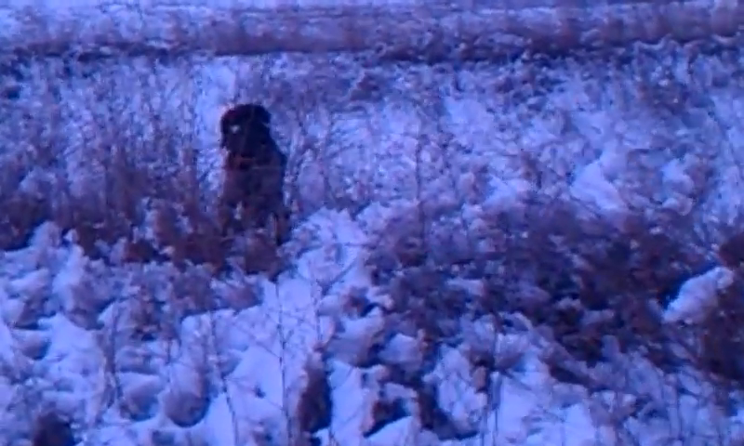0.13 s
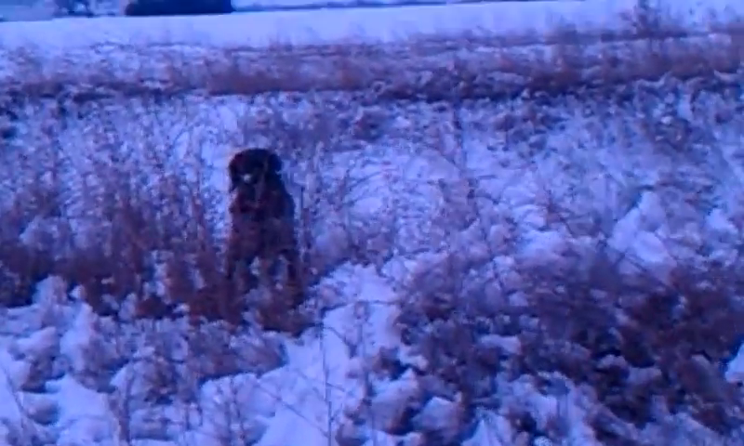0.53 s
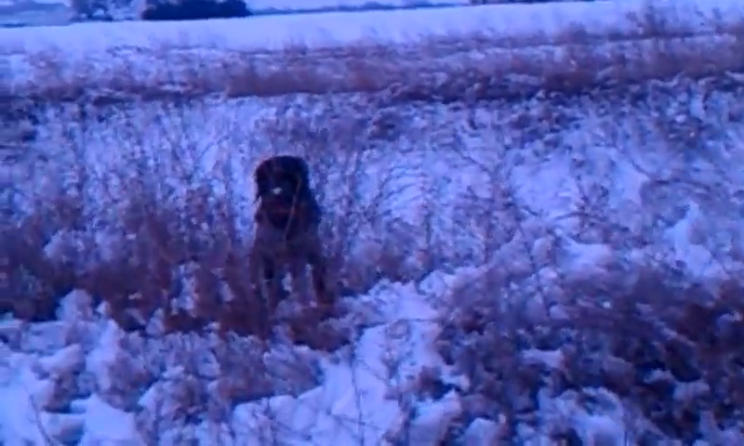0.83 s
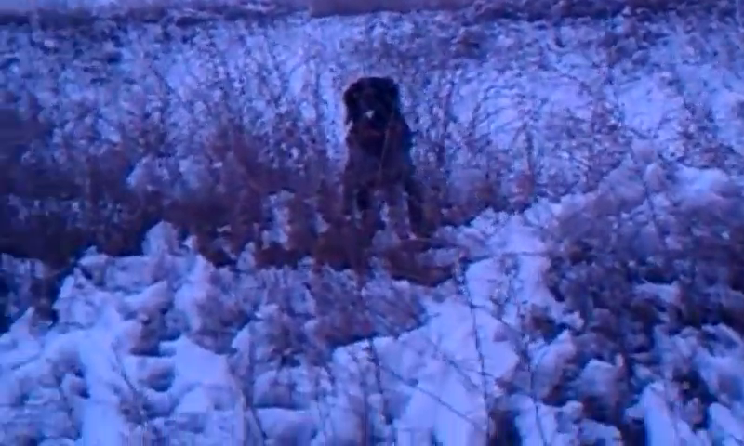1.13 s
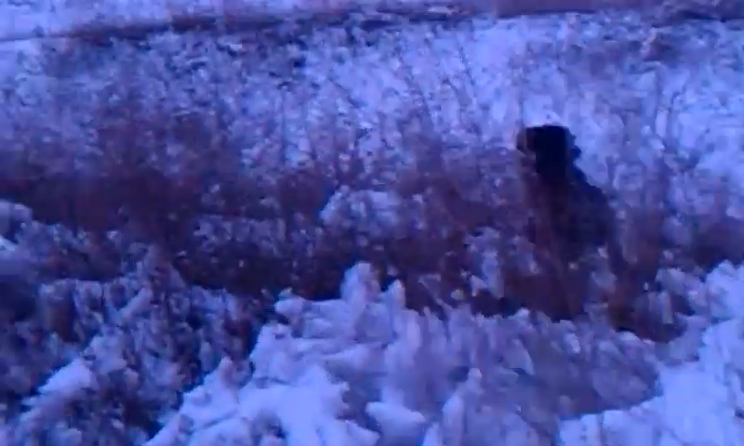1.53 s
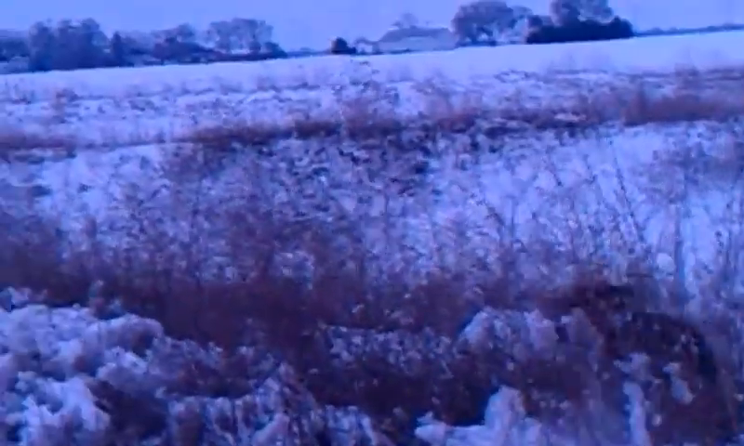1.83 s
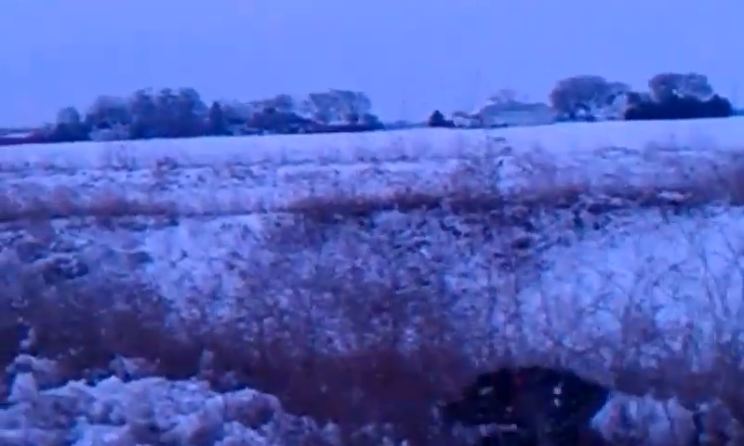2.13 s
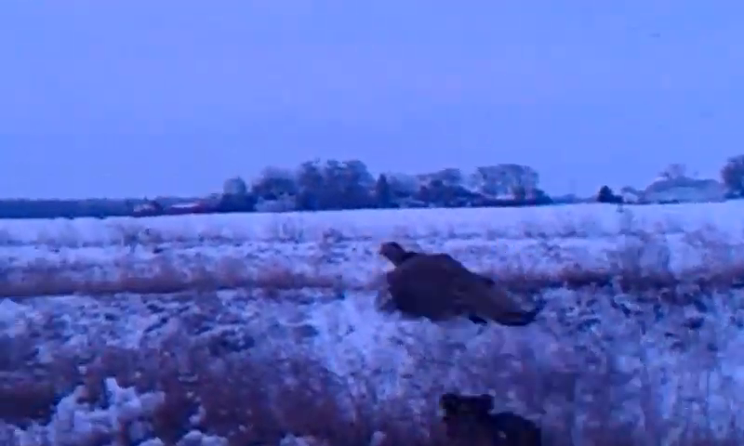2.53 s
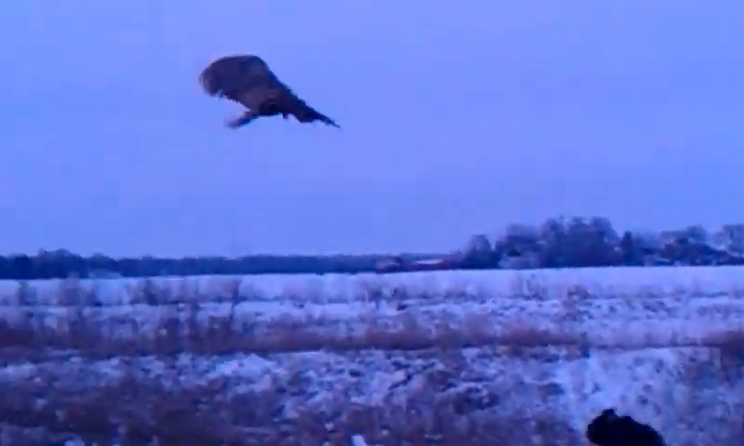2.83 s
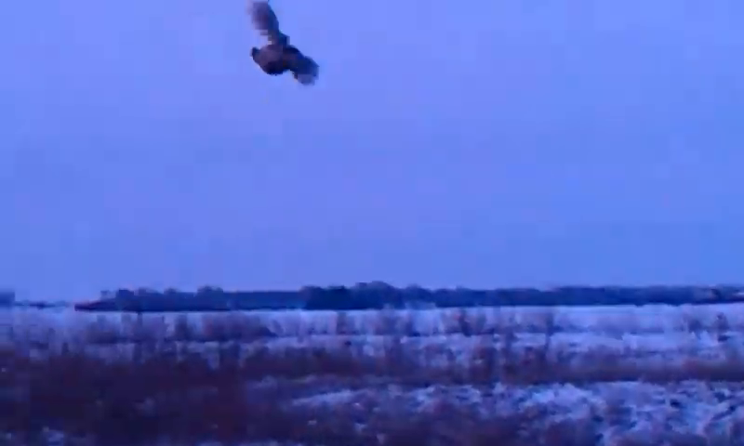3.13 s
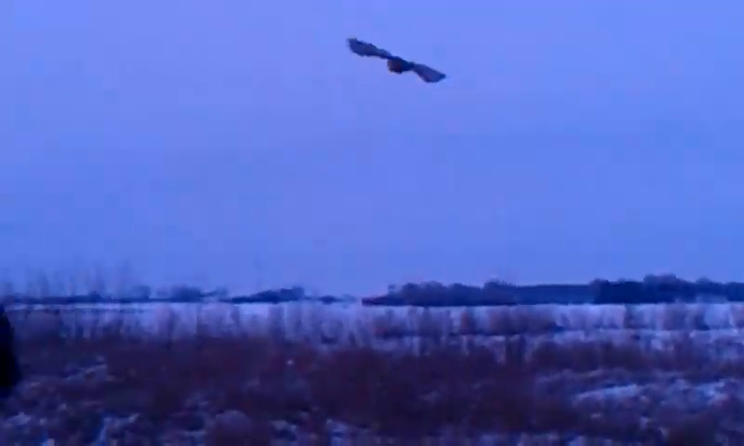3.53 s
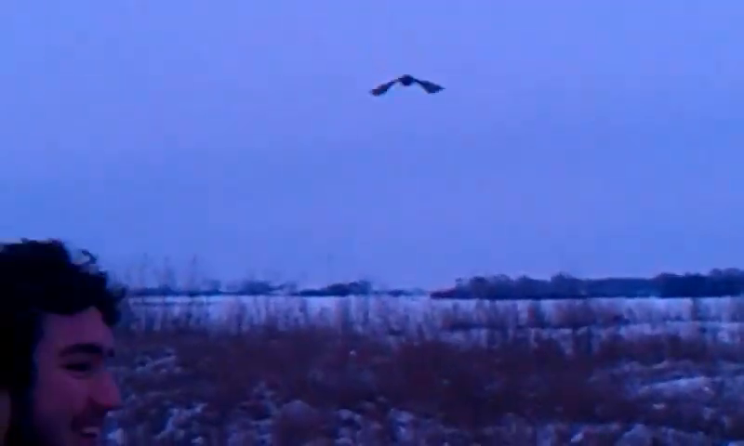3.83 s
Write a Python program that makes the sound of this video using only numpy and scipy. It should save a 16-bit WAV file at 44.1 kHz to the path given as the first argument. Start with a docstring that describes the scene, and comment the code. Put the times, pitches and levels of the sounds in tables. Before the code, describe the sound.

A pheasant's wings thrash out of dry brush and beat away, whirring, in gusty wind.

```python
"""Pheasant flushing in snow

Dry grass rustles and snow crunches underfoot. A pheasant breaks out of frozen brush, its wings
thrashing and snapping the stalks, then flies past at 14 beats a second, the stiff feathers
chirping and humming at each stroke. Wind buffets the microphone; one sharp click comes late."""
import sys
import numpy as np
from scipy import signal
from scipy.fft import rfft, irfft
from scipy.io import wavfile
from scipy.ndimage import uniform_filter1d

SR = 44100
rng = np.random.default_rng(int(sys.argv[2]) if len(sys.argv) > 2 else 0)


def to_wav(sig):
    """Store sig (one row per channel, or 1-D mono) as 16-bit WAV at the path in sys.argv[1].

    Samples outside -1..1 are clipped; the rate is SR.
    """
    pcm = np.clip(np.atleast_2d(sig), -1, 1) * 32767
    pcm = np.round(pcm).astype(np.int16)
    wavfile.write(sys.argv[1], SR, pcm.T)  # frames by channels


N = 176400
TIME = np.arange(N) / SR


def amp(db):
    """Decibels to gain."""
    return 10 ** (np.asarray(db) / 20)


def unit(x):
    """Scale to rms 1."""
    return x / np.sqrt(np.mean(x ** 2) + 1e-20)


def add(mix, s, sound):
    """Mix a sound in at s seconds."""
    part = mix[max(round(s * SR), 0):][:len(sound)]
    part += sound[:len(part)]


def curve(points, s=TIME):
    """Interpolate (t/s, value) points."""
    return np.interp(s, *np.transpose(points))


def colour(x, spectrum):
    """Filter by (f/Hz, level/dB) points, to rms 1."""
    hz, db = np.transpose(spectrum)
    f = np.fft.rfftfreq(len(x), 1 / SR)
    gain = amp(np.interp(np.log(f + 1), np.log(hz), db))
    return unit(irfft(rfft(x) * gain, len(x)))


def wander(rate_hz):
    """Slow random motion, rms 1."""
    f = np.fft.rfftfreq(N, 1 / SR)
    return unit(irfft(rfft(rng.standard_normal(N)) / (1 + (f / rate_hz) ** 4), N))


def crackle(spectrum, per_s, spread_db, hiss, clump_db, stalks=24, decay_s=0.00038):
    """Clumps of tiny uneven cracks, each ringing one stalk, over a hiss of rubbing."""
    sizes = amp(spread_db * np.minimum(rng.exponential(1, N), 3))
    hits = sizes * (rng.random(N) < per_s / SR)
    stalk = rng.integers(stalks, size=N)
    rings = rng.standard_normal((stalks, 256)) * np.exp(-np.arange(256) / SR / decay_s)
    cracks = sum(signal.oaconvolve(hits * (stalk == k), unit(ring))[:N] for k, ring in enumerate(rings))
    rustle = unit(cracks) + hiss * rng.standard_normal(N)
    return colour(rustle * amp(clump_db * wander(rate_hz=58)), spectrum)


# Grass rustle: t/s, level/dB
GRASS_LEVEL = [(0, -36.5), (.06, -35), (.19, -45.5), (.3, -41.5), (.45, -44), (.6, -33.5), (.69, -32),
               (.8, -37), (.95, -48.5), (1.08, -46.5), (1.2, -36.5), (1.6, -81)]
# Grass spectrum: f/Hz, level/dB
GRASS_EQ = [(300, -9), (3400, -7), (5500, -13), (7000, -9), (8150, 3), (9200, -8), (16000, -20.5)]


def grass():
    """Dry blades stir and rub before the flush."""
    return crackle(GRASS_EQ, per_s=2300, spread_db=2.0, hiss=1.3, clump_db=1.85) * amp(curve(GRASS_LEVEL))


def eddies(spectrum):
    """Turbulent noise of even strength."""
    noise = colour(rng.standard_normal(N), spectrum)
    power = uniform_filter1d(uniform_filter1d(noise ** 2, size=700), size=500)
    return unit(noise / np.sqrt(power))


def swells(rows, edge):
    """Gain of rounded bursts (t/s, length/s, level/dB); a higher edge is squarer."""
    return np.sqrt(sum(amp(db) ** 2 * np.exp(-abs(2 * (TIME - s) / length) ** edge)
                       for s, length, db in rows))


# Field air spectrum: f/Hz, level/dB
AIR_EQ = [(30, 25.5), (700, 9), (1600, 6.5), (3500, -17), (5500, -9), (8000, -23), (16000, -63)]
# Rumble between buffets: t/s, level/dB
RUMBLE_LEVEL = [(.2, -71), (.6, -41.5), (.93, -50), (1.72, -47), (1.87, -36.5), (2.11, -54), (2.22, -29),
                (2.92, -29.5), (3.05, -32.5), (3.19, -43.5), (3.3, -25.5), (3.85, -30), (3.92, -55)]
# Rumble spectrum: f/Hz, level/dB
RUMBLE_EQ = [(20, -25), (60, 1.5), (120, 5), (400, -8.5), (700, -19.5), (1100, -47), (8000, -115)]
# Buffets: peak t/s, length/s, level/dB
WIND_BUFFETS = [(.37, 0.042, -38.5), (.69, 0.049, -34), (1.025, 0.03, -38.5), (1.785, 0.032, -32.5),
                (2.278, 0.023, -23.5), (2.387, 0.031, -16.5), (2.455, 0.056, -22), (2.522, 0.022, -17),
                (2.595, 0.059, -21), (2.758, 0.044, -25.5), (2.815, 0.052, -24), (2.87, 0.014, -19.5),
                (2.94, 0.064, -24.5), (3.293, 0.024, -17.5), (3.33, 0.021, -20), (3.39, 0.048, -17),
                (3.44, 0.012, -15), (3.482, 0.021, -16), (3.55, 0.029, -17.5), (3.605, 0.041, -19),
                (3.677, 0.026, -18.5), (3.72, 0.03, -19), (3.805, 0.02, -23.5)]
# Buffet spectrum: f/Hz, level/dB
BUFFET_EQ = [(25, -6.5), (110, 6), (250, -0.5), (450, -8), (750, -19), (1100, -45), (8000, -116)]
# Puffs, the first as the wings pass close: t/s, level/dB
AIR_PUFFS = [(2.749, -22), (2.764, -22), (2.869, -22), (2.896, -21), (3.335, -23.5), (3.407, -24.5),
             (3.476, -28), (3.674, -26.5)]
# Puff length; spectrum: f/Hz, level/dB
PUFF_S, PUFF_EQ = 0.0088, [(100, 7), (750, -1), (1400, -17.5), (8000, -92)]


def wind(air_db=-46):
    """Rumble, buffets and sharp puffs on the microphone, over quiet field air."""
    air = amp(air_db) * colour(rng.standard_normal(N), AIR_EQ)
    rumble = eddies(RUMBLE_EQ) * amp(curve(RUMBLE_LEVEL))
    buffets = eddies(BUFFET_EQ) * swells(WIND_BUFFETS, edge=10.5)
    puffs = eddies(PUFF_EQ) * swells([(s, PUFF_S, db) for s, db in AIR_PUFFS], edge=2.2)
    return air + rumble + buffets + puffs


# Snow underfoot: t/s, level/dB
SNOW_CRUNCHES = [(.031, -27.5), (.319, -27.5), (.488, -27.5), (0.539, -32.5), (0.696, -33), (1.044, -24.5)]
# Grit spectrum: f/Hz, level/dB
GRIT_EQ = [(700, -2), (12000, -21)]


def crunches(knock_hz=378, knock_decay_s=0.0019, grit_decay_s=0.0057, grit_db=-6):
    """Snow crust gives way: a dull knock, a short gritty tail."""
    out, t = np.zeros(N), np.arange(2048) / SR
    for s, db in SNOW_CRUNCHES:
        knock = np.sin(2 * np.pi * knock_hz * rng.uniform(.8, 1.2) * t) * np.exp(-t / knock_decay_s)
        grit = colour(rng.standard_normal(len(t)), GRIT_EQ) * np.exp(-t / grit_decay_s)
        add(out, s, amp(db) * (knock + amp(grit_db) * grit))
    return out


# Breaking stalks: t/s, level/dB, f/Hz
STALK_SNAPS = [(.872, -25.5, 11000), (1.284, -25, 7040), (1.392, -21, 7700), (1.422, -18, 8000),
               (1.946, -29, 6950), (1.825, -11, 8250), (1.919, -13.5, 11900), (1.966, -14, 7900),
               (2.029, -20, 7500), (2.38, -19, 7000), (2.491, -15.5, 8600)]


def snaps(decay_s=0.00074, width_oct=0.28, body_db=-17):
    """Each breaking stalk cracks around its own pitch."""
    out, t, f = np.zeros(N), np.arange(1024) / SR, np.fft.rfftfreq(1024, 1 / SR)
    envelope = t / decay_s * np.exp(1 - t / decay_s)
    for s, db, hz in STALK_SNAPS:
        shape = np.exp(-(np.log2((f + 1) / hz) / width_oct) ** 2) + amp(body_db) * f / (f + 1500)
        crack = irfft(rfft(rng.standard_normal(len(t)) * envelope) * shape)
        add(out, s - decay_s, amp(db) * unit(crack) * np.sqrt(np.mean(envelope ** 2)))
    return out


def patchy(x, depth_db):
    """Narrow spectral peaks and dips come and go at random, giving the rustle a faint warble."""
    frames = signal.stft(x, nperseg=512)[2]
    patches = uniform_filter1d(rng.standard_normal(frames.shape), size=2, axis=0)
    patches = unit(uniform_filter1d(patches, size=7, axis=1))
    return unit(signal.istft(frames * amp(depth_db * patches), nperseg=512)[1][:N])


# Shaken brush: t/s, level/dB
BRUSH_LEVEL = [(1.05, -42), (1.17, -38.5), (1.24, -24.5), (1.7, -27.5), (1.92, -28), (2.1, -31), (2.2, -35),
               (2.365, -37.5), (2.385, -28), (2.7, -31.5), (2.9, -37.5), (3.2, -39), (3.45, -53),
               (4, -49.5)]
# Brush spectrum: f/Hz, level/dB
BRUSH_EQ = [(100, -8), (400, -11.5), (800, -4.5), (1600, -2.5), (2400, -7.5), (3600, 0), (4700, -3),
            (5600, -6.5), (6600, 4), (8300, 4), (10200, 0.5), (12000, -10), (16000, -12)]
# Wing blows on the brush: start t/s, length/s, level/dB
WING_BLOWS = [(1.225, 0.047, -38), (1.295, 0.029, -24), (1.386, 0.037, -17), (1.47, 0.029, -17.5),
              (1.547, 0.035, -20), (1.641, 0.031, -23.5), (1.734, 0.0053, -22), (1.822, 0.019, -21.5),
              (1.902, .022, -24.5), (1.988, 0.017, -23.5), (2.38, 0.032, -30), (2.467, 0.026, -23),
              (2.54, 0.027, -22.5), (2.646, 0.0067, -29.5)]


def brush(attack_s=0.0059, release_s=0.015):
    """Frozen brush shakes; each wing blow adds an abrupt burst of crackle that dies away."""
    shaking = crackle(BRUSH_EQ, per_s=700, spread_db=2.5, hiss=1.0, clump_db=1.5)
    blows = crackle(BRUSH_EQ, per_s=1200, spread_db=3.8, hiss=0.45, clump_db=1.2)
    force = np.zeros(N)
    for s, length, db in WING_BLOWS:
        attack = np.clip((TIME - s) / attack_s + 1, 0, 1)
        release = np.exp(-np.maximum(TIME - s - length, 0) / release_s)
        force += amp(db) * attack * release
    return patchy(shaking, depth_db=4.5) * amp(curve(BRUSH_LEVEL)) + patchy(blows, depth_db=4.0) * force


CHIRP_HZ, CHIRP_S = 3462, 0.011  # nominal
HUM_HZ, HUM_S = 575, 0.01426  # nominal
LEAD_S = 0.0049  # stroke onset to peak
# Feather swish spectrum: f/Hz, level/dB
SWISH_EQ = [(300, -15), (1500, -4), (5200, -15), (8400, -1.5), (14000, -40)]


def stroke(chirp_db, hum_db, hum_hz, stretch, swish_db, rough, chirp_hz=CHIRP_HZ):
    """A feather flutters with a falling hum, chopping a falling whistle and a swish of air."""
    t = np.arange(1024) / SR

    def arch(length):
        """Swell with an early peak."""
        return np.sin(np.pi * np.minimum(t / length, 1) ** 0.72) ** 2

    def glide(hz, jitter, fall, length):
        """Phase of a randomly detuned, falling note."""
        pitch = hz * (1 + jitter * rng.standard_normal()) * np.exp(-fall * (t / length - .4))
        return 2 * np.pi * (np.cumsum(pitch) / SR + rng.random())

    chirp_s = CHIRP_S * stretch
    flutter = glide(hum_hz, jitter=0.027, fall=0.56, length=HUM_S)
    whistle = glide(chirp_hz, jitter=0.02, fall=0.23 * rng.uniform(.6, 1.5), length=chirp_s)
    whistle += rough * unit(uniform_filter1d(rng.standard_normal(len(t)), size=40))
    overtone = amp(-8.5) * np.sin(2.4 * whistle)
    undertone = amp(-11.5) * np.sin(whistle - flutter)
    tone = np.sqrt(2) * (np.sin(whistle) + overtone + undertone)
    swish = amp(swish_db) * colour(rng.standard_normal(len(t)), SWISH_EQ)
    chirp = (tone + swish) * (1 + 0.2 * np.sin(flutter))
    hum = np.sqrt(2) * np.sin(flutter)
    return amp(chirp_db) * arch(chirp_s) * chirp + amp(hum_db) * arch(HUM_S) * hum


# Flaps in the brush: t/s, hum level/dB, flutter f/Hz
FIRST_FLAPS = [(1.305, -30.5, 786), (1.488, -31.5, 812), (1.62, -31.5, 1486), (1.741, -32.5, 1124),
               (2.044, -30, 712)]


def flaps():
    """Rough first wingbeats: mostly swish, little whistle."""
    out = np.zeros(N)
    for s, db, hz in FIRST_FLAPS:
        add(out, s - LEAD_S, stroke(db - 12, db, hz, stretch=0.83, swish_db=15, rough=1.2))
    return out


# Downstrokes: t/s, chirp level/dB
DOWN_BEATS = [(1.853, -23), (1.924, -24.5), (1.993, -23), (2.064, -20), (2.136, -22), (2.207, -24.5),
              (2.278, -22.5), (2.351, -25), (2.422, -27.5), (2.493, -33), (2.566, -42), (2.638, -28),
              (2.711, -32.5), (2.784, -30.5), (2.857, -30.5), (2.931, -33.5), (3.002, -36), (3.077, -40.5),
              (3.152, -44), (3.224, -37.5), (3.299, -42.5), (3.373, -37.5), (3.445, -44), (3.616, -47.5),
              (3.691, -45), (3.912, -44.5)]
# Feather hum, strongest at lift-off: t/s, level/dB
DOWN_HUM_LEVEL = [(1.88, -32), (2.064, -22.5), (2.14, -33.5), (3.199, -42)]
# Second chirp relative to first: t/s, level/dB
SECOND_LEVEL = [(2, -18), (2.4, -6), (2.95, -8.5), (3.1, 4), (3.5, -13)]


def downstrokes(takeoff_s=2, hum_rise=0.16, settle_s=0.2, gap_s=0.0172):
    """Feathers chirp twice per downstroke; the hum is higher while the bird climbs hardest."""
    out = np.zeros(N)
    for s, db in DOWN_BEATS:
        hz = HUM_HZ * (1 + hum_rise * np.exp(-max(s - takeoff_s, 0) / settle_s))
        first = stroke(db, curve(DOWN_HUM_LEVEL, s), hz, stretch=0.96, swish_db=-6, rough=0.076)
        second_db = db + curve(SECOND_LEVEL, s)
        second = stroke(second_db, second_db - 1.5, hz, stretch=0.85, swish_db=-18, rough=0.17)
        add(out, s - LEAD_S, first)
        add(out, s - LEAD_S + gap_s, second)
    return out


# Upstrokes: t/s, chirp level/dB, hum level/dB
UP_BEATS = [(2.598, -32, -38), (2.750, -29, -23), (2.82, -31, -29.5), (2.893, -31, -27.5),
            (2.966, -36.5, -32.5), (3.04, -33, -25.5), (3.115, -30.5, -27), (3.192, -30.5, -30),
            (3.267, -38.5, -37), (3.342, -43, -31)]
# Upstroke chirp pitch: t/s, f/Hz
UP_CHIRP_HZ = [(2.7, 4090), (3.0, 3635)]


def upstrokes():
    """One higher, raspier feather chirp per upstroke, sinking as the bird passes."""
    out = np.zeros(N)
    for s, chirp_db, hum_db in UP_BEATS:
        hz = curve(UP_CHIRP_HZ, s)
        beat = stroke(chirp_db, hum_db, HUM_HZ, stretch=1, swish_db=-7, rough=0.45, chirp_hz=hz)
        add(out, s - LEAD_S, beat)
    return out


# Click spectrum: f/Hz, level/dB
CLICK_EQ = [(800, -15), (9000, -7), (15000, -36)]


def click(at_s=3.769, db=-15.5, decay_s=0.001):
    """One dry, broadband click close to the microphone."""
    out, envelope = np.zeros(N), np.exp(-np.arange(512) / SR / decay_s)
    add(out, at_s, rng.standard_normal(len(envelope)) * envelope)
    return amp(db) * colour(out, CLICK_EQ) * np.sqrt(np.sum(envelope ** 2) / N)


def scene():
    """All sources, mono."""
    field = grass() + wind() + crunches() + snaps() + brush()
    wings = flaps() + downstrokes() + upstrokes()
    return (field + wings + click())[None]


def record(dry):
    """Low-pass at 16 kHz."""
    lowpass = signal.firwin(511, 16000, window=("kaiser", 9), fs=SR)
    return signal.oaconvolve(dry, lowpass[None], "same")


dry = scene()
out = record(dry)
to_wav(out)
```